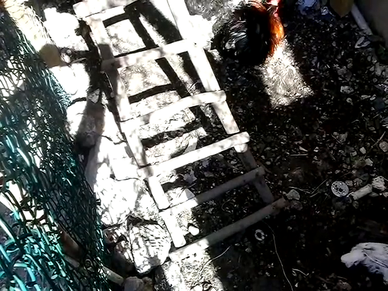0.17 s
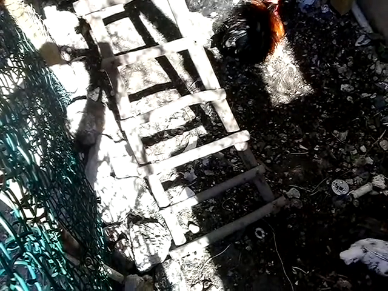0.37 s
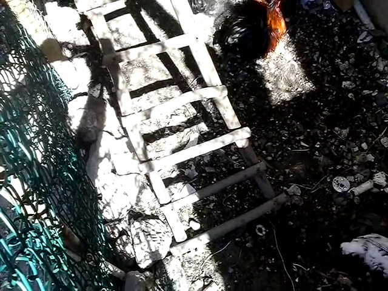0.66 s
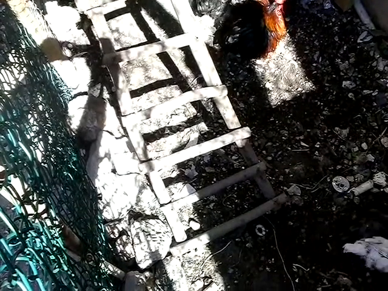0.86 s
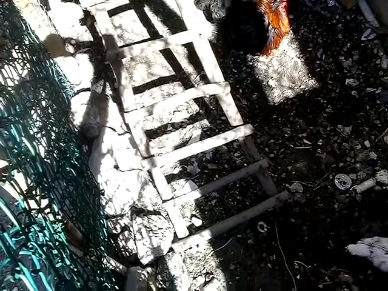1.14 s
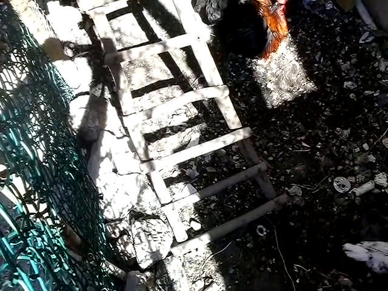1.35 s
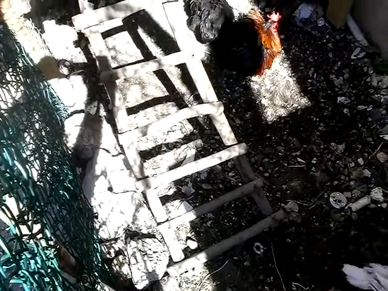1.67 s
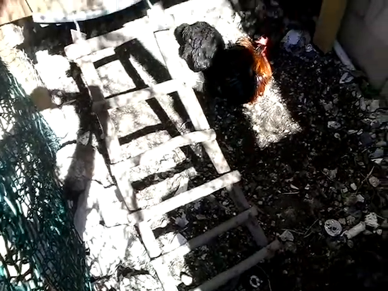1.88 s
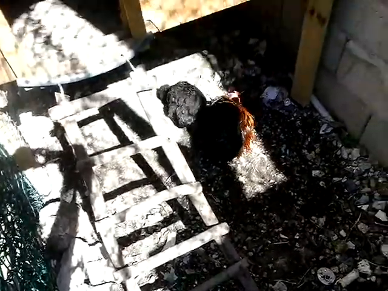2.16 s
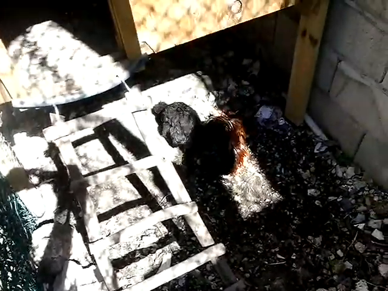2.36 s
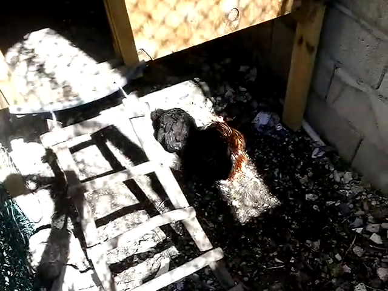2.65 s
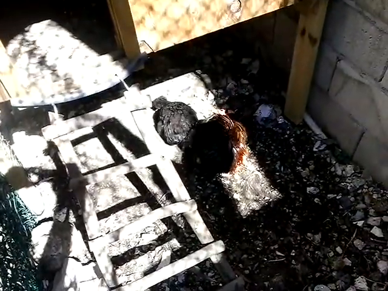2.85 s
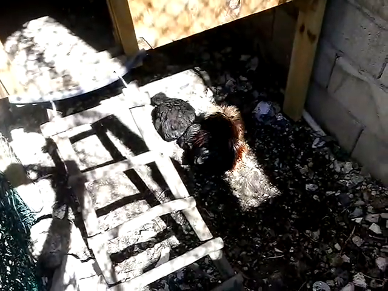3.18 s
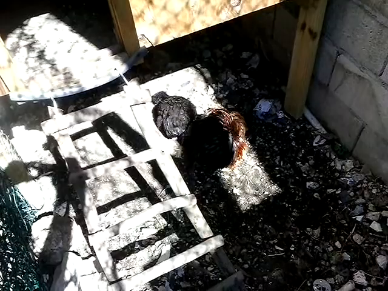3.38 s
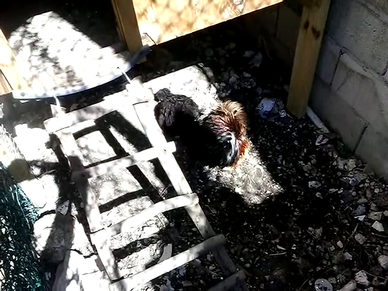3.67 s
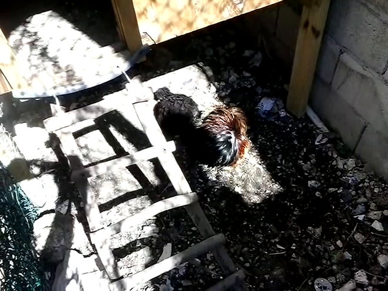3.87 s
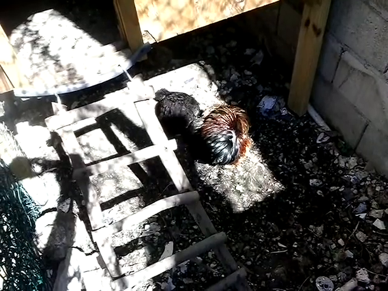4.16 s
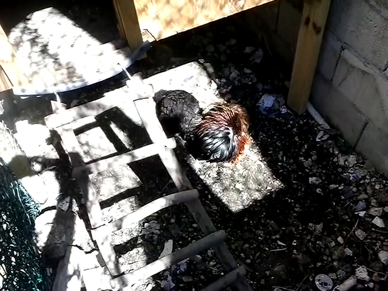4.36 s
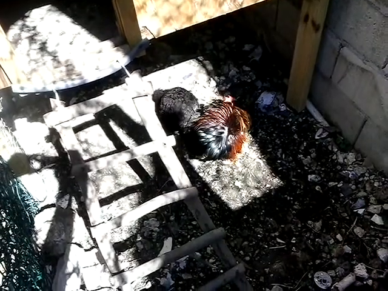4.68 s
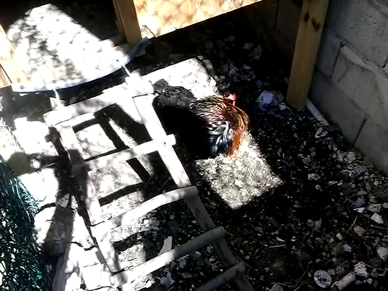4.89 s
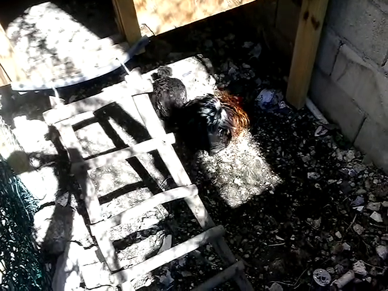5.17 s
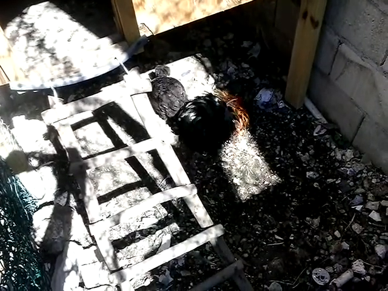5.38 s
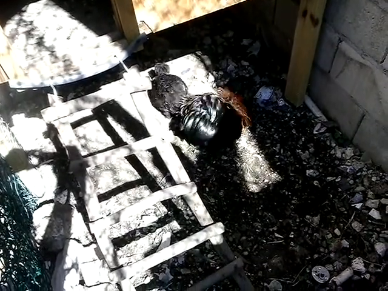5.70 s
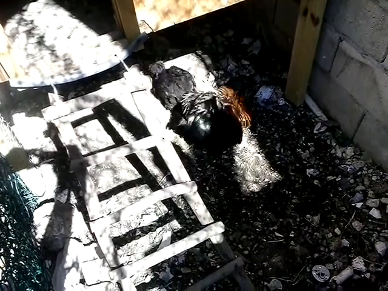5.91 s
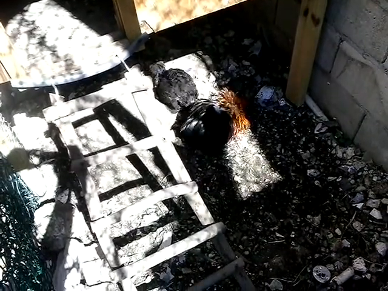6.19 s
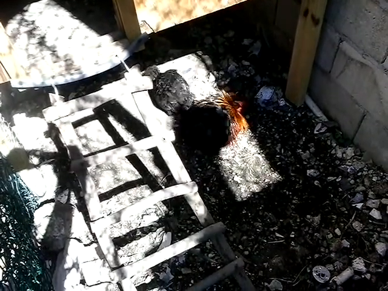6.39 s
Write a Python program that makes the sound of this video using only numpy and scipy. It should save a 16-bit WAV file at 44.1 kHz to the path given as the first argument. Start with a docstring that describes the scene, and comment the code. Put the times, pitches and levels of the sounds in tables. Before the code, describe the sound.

A quiet outdoor pen with near walls, heard through a small hand-held microphone with very faint hiss. At 0.2 s feet fling dry dirt in a short, bright gritty swish. At 0.7 s a small bird gives a high chirp of three quick falling notes; at about 0.86 s another sharp spray of dirt comes with a stone knocking on wood, a short hard clack. A dull, low thump bumps the microphone at 1.1 s, with weaker ones around it. From 1.8 to 3.3 s chirps repeat among faint peeps and tiny rustles. From 3.75 to 4.2 s feathers shake in rapid snapping, puffing beats over a dry rustle, strongest after 4 s; another flurry runs 4.5 to 4.75 s, and two last beats come near 5.05 s. Chirps continue through 3.8, 4.2, 5.2 and 5.6 s, growing fainter, then only slight rustles remain until 6.5 s.

```python
"""Dust bath in a walled pen

Chickens dust-bathe outdoors: feet and wings throw dry dirt (bursts of filtered grains), feathers shake in
quick beats (noise snaps and puffs over a rustle) and a flung stone knocks on wood (ringing modes).
A small bird repeats a chirp of three falling notes (gliding sines with an octave), among stray peeps, blurred
by the walls; dull thumps (low modes) and a rumble reach the hand-held microphone over a faint hiss.
"""
import sys
import numpy as np
from scipy import signal
from scipy.fft import rfft, irfft
from scipy.io import wavfile

SR = 44100
rng = np.random.default_rng(int(sys.argv[2]) if len(sys.argv) > 2 else 0)


def to_wav(s):
    """Save 16-bit WAV."""
    ch = np.atleast_2d(s).T  # columns
    pcm = np.round(np.clip(ch, -1, 1) * 32767)  # PCM
    wavfile.write(sys.argv[1], SR, pcm.astype(np.int16))


N = 288414

# Hiss spectrum: f/Hz, level/dB
HISS_SPECTRUM = [(30, -29), (110, -4.5), (280, -19), (450, -7.5), (700, -9), (1300, -12), (3000, -15),
                 (5000, -16.5), (7000, -12), (7800, -13.5), (8050, -20.5), (8400, -9.5), (9000, -19),
                 (9400, -43.5)]
# Thumps on the microphone: t/s, level/dB
THUMPS = [(0.113, -65), (0.358, -62), (0.407, -60.5), (0.628, -53.5), (0.738, -57), (0.813, -53),
          (0.851, -52), (0.952, -41.5), (0.99, -50.5), (1.121, -28), (1.147, -47.5), (1.19, -51),
          (1.264, -51), (2.023, -55), (2.339, -49), (2.423, -46.5), (2.492, -52), (2.55, -58),
          (2.631, -55.5), (2.985, -53), (3.515, -58)]
# What a thump rings: f/Hz, level/dB, t60/s
THUMP_MODES = [(95.3, -13, 0.13), (128, 4.5, 0.12), (167, 2.5, .12), (226, 0.5, 0.047), (353, -30, 0.049)]
# Handling rumble, level curve: t/s, level/dB
RUMBLE_CURVE = [(0.0, -83), (0.31, -71), (0.78, -74), (1.02, -58), (1.44, -84), (2.02, -68), (2.26, -73.5),
                (2.48, -66), (2.8, -79), (3.3, -69.5), (3.73, -75), (4.06, -62), (4.84, -73), (5.08, -68.5),
                (6.16, -80), (6.54, -77)]
# Low murmurs or wing whumps to high rustles: t/s, level/dB, rise and hold together/s, low f/Hz, high f/Hz
SMALL_BURSTS = [(0.143, -73, .04, 1750, 2250), (0.416, -64, 0.064, 630, 1000),
                (0.616, -66, 0.049, 1980, 4000), (0.647, -56, 0.041, 6100, 8100),
                (0.84, -52, 0.025, 6100, 7100), (1.756, -72, 0.041, 1050, 1340),
                (1.919, -61, 0.073, 4400, 8600), (2.031, -52, 0.015, 5160, 7300),
                (2.244, -61, 0.07, 3330, 5140), (2.417, -64, 0.12, 4050, 7840),
                (2.484, -66.5, 0.055, 660, 1180), (2.569, -67, 0.017, 5500, 6930),
                (2.677, -66, 0.015, 4500, 7690), (2.97, -66, 0.022, 4330, 7500),
                (3.176, -63, 0.12, 340, 557), (3.503, -71, 0.086, 5160, 8300),
                (3.612, -65.5, 0.046, 350, 527), (4.054, -53, 0.239, 354, 566),
                (4.379, -55, 0.059, 4200, 6600), (4.518, -57.5, 0.13, 334, 760),
                (4.756, -61, 0.11, 1686, 2230), (4.928, -64, 0.033, 1750, 3670),
                (5.62, -65.5, 0.23, 6150, 7700), (5.745, -58.5, 0.05, 6360, 6900),
                (5.866, -74.5, 0.099, 1300, 2150), (5.852, -68.5, 0.16, 5700, 7700),
                (5.958, -71.5, 0.048, 6030, 6600), (6.065, -66.5, .195, 6050, 7800),
                (6.07, -71, 0.057, 1330, 2310), (6.215, -67, .033, 6000, 7320),
                (6.217, -73.5, 0.036, 4120, 4730), (6.293, -55.5, 0.025, 2370, 3420),
                (6.298, -63, 0.027, 927, 1470), (6.395, -57, 0.032, 2370, 3200)]
# Feet raking and throwing dirt: t/s, level/dB, rise/s, hold/s, t60/s, lowest f/Hz, tilt/dB per octave
SCRATCHES = [(0.233, -24.5, 0.038, 0.036, 0.12, 1620, 11), (0.311, -48, 0.028, 0.05, 0.14, 1592, 2.5),
             (0.4, -49, 0.046, 0.018, 0.31, 700, 10), (0.857, -29, 0.0025, 0.029, 0.17, 1274, 4),
             (0.909, -47, .01, 0.086, 0.16, 998, -2), (3.601, -49, 0.011, 0.042, 0.16, 1540, -2.5),
             (5.316, -49, 0.01, 0.09, 0.19, 1440, -2.5)]
# Spectrum of thrown dirt before the tilt: f/Hz, level/dB
DIRT_SPECTRUM = [(600, -4), (2600, -2), (3400, 3), (4300, -3.5), (5400, -3), (6300, 1.5), (7200, -2),
                 (7700, -9), (8500, -20)]
# Peeps, stray notes, faint clucks: t/s, level/dB, start f/Hz, end f/Hz, length/s, hoarseness 0-1
PEEPS = [(0.454, -48.5, 1830, 1920, 0.02, 0.06), (0.792, -45.5, 2983, 3283, 0.17, 0.09),
         (1.883, -54, 2516, 1924, 0.056, 0.15), (2.034, -38.5, 5390, 5464, 0.014, 0.02),
         (2.102, -64.5, 1700, 2160, 0.0364, 0.07), (2.136, -65.5, 2436, 2406, 0.11, 0.03),
         (2.627, -69.5, 1970, 1884, 0.043, 0.1), (2.813, -59.5, 960, 824, 0.017, 0.01),
         (2.874, -55, 7180, 6880, 0.023, 0.03), (3.109, -48.5, 3326, 2770, 0.055, 0.11),
         (3.197, -56.5, 2530, 2162, 0.092, 0.14), (3.254, -44, 2617, 3000, 0.07, 0.06),
         (3.292, -60.5, 2310, 3006, 0.068, 0.26), (3.46, -60, 1140, 1332, 0.0345, 0.02),
         (4.396, -46, 5550, 5390, 0.022, 0), (5.357, -47, 3635, 3530, 0.036, 0),
         (5.469, -64.5, 6450, 6430, 0.024, 0.04), (5.706, -55.5, 3060, 2704, 0.047, 0.22),
         (5.754, -55, 3630, 3410, 0.071, 0.28), (6.145, -73.5, 1750, 1724, 0.038, 0.11)]
# Chirps: t/s, reference f/Hz, low note after/s, closing note after/s, high, low and closing level/dB,
# closing pitch ratio, octave trim/dB, high note's length ratio
CHIRPS = [(.702, 3635, 0.048, 0.2, -46.5, -55, -43, 1.05, 3.5, 0.96),
          (1.805, 3554, 0.051, 0.12, -51.5, -50, -43, 1.102, -16, 1.51),
          (2.336, 3690, 0.052, 0.12, -46.5, -45.5, -42, 0.99, -1.5, 1.13),
          (3.041, 3598, 0.049, .12, -55, -53, -44, 1.034, 2.5, 2.44),
          (3.826, 3590, .042, 0.11, -43.5, -48.5, -41, 1.11, -4.5, 0.74),
          (4.236, 3660, 0.041, 0.12, -44, -50, -40.5, 1.0, 1.5, 0.986),
          (5.228, 3734, 0.053, 0.11, -46, -54, -46, 0.98, -1.5, 0.67),
          (5.626, 3760, 0.036, 0.11, -52, -59, -49.5, 1.017, -1.5, 0.62)]
# High, low and closing note: start and end f over the reference, base length/s, hoarseness 0-1,
# octave level/dB before the chirp's trim
CHIRP_NOTES = [(0.99, .875, .058, 0.05, -8.5), (.76, .61, .085, .11, -23.5), (.885, .72, .063, .08, -24.5)]
# The stone's strike: t/s, level/dB
KNOCK = (.861, -24)
# What the struck wood rings: f/Hz, level/dB, t60/s
KNOCK_MODES = [(1265, -9, .13), (1540, -1, .13), (2630, -13, .1), (2980, -2, .13), (3810, -8, .14),
               (4590, -8, .12), (5220, -1, .12), (5820, -1, .1), (6110, -5, .1), (6820, -2, .09)]
# Bouts of feather shaking: t/s, level/dB, rise/s, hold/s, t60/s, treble delay/s, treble trim/dB, lowest f/Hz
SHAKES = [(3.76, -48.5, 0.019, 0.38, 0.97, 0.17, 3, 1080),
          (4.479, -48.5, 0.019, 0.2, 0.39, 0.069, -3.5, 776),
          (4.968, -49.5, 0.04, 0.11, 0.23, 0.063, 4.5, 778)]
# Wing beats: t/s, level/dB
BEATS = [(3.755, -35.5), (3.782, -31.5), (3.847, -33), (3.895, -32.5), (3.934, -37.5), (3.98, -31.5),
         (4.01, -22.5), (4.052, -24), (4.087, -23), (4.127, -30.5), (4.163, -21), (4.196, -26.5),
         (4.321, -41.5), (4.496, -47), (4.52, -30), (4.569, -22.5), (4.625, -22.5), (4.674, -31.5),
         (4.713, -32), (4.766, -42.5), (4.988, -42), (5.036, -27), (5.088, -25)]
# Feather spectrum: f/Hz, level/dB
FEATHER_SPECTRUM = [(600, -33), (800, -5), (1100, -3.5), (1450, -9), (2000, -2.5), (2600, -7), (3050, -8),
                    (3600, -1), (4700, -10.5), (6500, -7), (7600, -14)]

HISS_DB = -76
BURST_RISE_SHARE, BURST_T60_S = 0.23, 0.08
DIRT_TOP_HZ = 7300
PEEP_OCTAVE_DB = -23
PEN_T60_S, PEN_DB = 0.17, -3
TREBLE_STEP_DB = -12  # applied once to the joined treble, twice before it joins
TREBLE_FADE_POWER = 1.06  # times the fall in dB of the mids
HIGH_BAND_DB = -4.5
BASS_CUT_HZ, TOP_STOP_HZ = 110, 9540


def from_db(db):
    """Decibels to amplitude."""
    return 10 ** (np.asarray(db) / 20)


def rms_one(x):
    """Scale to rms 1."""
    return x / np.sqrt(np.mean(x ** 2) + 1e-20)


def add(track, s, piece):
    """Mix a piece in at time s."""
    i = round(s * SR)
    track[i:i + len(piece)] += piece[:N - i]


def band(x, low_hz, high_hz, order=5):
    """Butterworth band-pass."""
    edges = [low_hz, max(high_hz, low_hz + 20)]
    return signal.sosfilt(signal.butter(order, edges, "band", fs=SR, output="sos"), x)


def coloured(x, spectrum):
    """Shape x by a dB spectrum on a log-frequency axis; rms 1."""
    hz = np.maximum(np.fft.rfftfreq(len(x), 1 / SR), 1)
    point_hz, point_db = np.array(spectrum).T
    gain = from_db(np.interp(np.log(hz), np.log(point_hz), point_db))
    return rms_one(irfft(rfft(x) * gain, len(x)))


def flicker(cutoff_hz):
    """Low-passed noise of rms 1, for slow random level changes."""
    low_pass = signal.butter(2, cutoff_hz, fs=SR, output="sos")
    return rms_one(signal.sosfilt(low_pass, rng.standard_normal(N)))


def grit(size, per_s, spread_db):
    """Uneven grainy clicks over a little smooth noise; rms 1."""
    strengths = from_db(spread_db * np.minimum(rng.exponential(1, size), 4))
    clicks = strengths * rng.choice([-1, 1], size) * (rng.random(size) < per_s / SR)
    return rms_one(clicks + 0.34 * rng.standard_normal(size))


def swell(rise, hold, t60):
    """Envelope: a smooth rise, a hold and an even decay in dB."""
    t = np.arange(round((rise + hold + t60) * SR)) / SR
    attack = np.sin(np.pi / 2 * np.clip(t / max(rise, 1e-4), 0, 1)) ** 2
    return attack * from_db(-60 * np.maximum(t - rise - hold, 0) / t60)


def ring(clicks, hz, t60):
    """Two-pole resonator: a unit click starts a decaying sine of height 1."""
    r, w = from_db(-60 / (t60 * SR)), 2 * np.pi * hz / SR
    return signal.lfilter([0, np.sin(w)], [1, -2 * r * np.cos(w), r * r], clicks + 1e-18)


def hiss():
    """Faint coloured noise whose level wavers slightly."""
    level = from_db(HISS_DB + 0.4 * flicker(11.0))
    return level * coloured(rng.standard_normal(N), HISS_SPECTRUM)


def rumble():
    """Low noise from handling, lumpy in level."""
    times, levels_db = np.transpose(RUMBLE_CURVE)
    curve_db = np.interp(np.arange(N) / SR, times, levels_db)
    noise = rms_one(band(rng.standard_normal(N), 45, 300, order=2))
    return noise * from_db(curve_db + 1.3 * flicker(10.0))


def thumps():
    """Soft pushes ring low modes, each mode with a new strength every time."""
    times, levels_db = np.transpose(THUMPS)
    at = np.round(times * SR).astype(int)
    out = np.zeros(N)
    for hz, mode_db, t60 in THUMP_MODES:
        clicks = np.zeros(N)
        clicks[at] = from_db(levels_db + mode_db - 1 + rng.normal(0, 1.0, len(at)))
        out += ring(clicks, hz, t60)
    push = -signal.windows.hann(round(0.0042 * SR))  # a soft contact lasts some milliseconds
    return np.convolve(out, push / abs(push.sum()))[:N]


def small_bursts(grains):
    """Small noise bursts, from low murmurs or wing whumps to high rustles, each in its own band."""
    out = np.zeros(N)
    for s, level_db, length, low_hz, high_hz in SMALL_BURSTS:
        shape = swell(BURST_RISE_SHARE * length, (1 - BURST_RISE_SHARE) * length, BURST_T60_S)
        i = round(s * SR)
        burst = rms_one(band(grains[i:i + len(shape)], low_hz, high_hz, order=3))
        add(out, s, from_db(level_db) * shape * burst)
    return out


def scratches(grains):
    """Feet rake the ground: wide bursts of grains, each with its own brightness."""
    out = np.zeros(N)
    for s, level_db, rise, hold, t60, low_hz, tilt_db in SCRATCHES:
        shape = swell(rise, hold, t60)
        i = round(s * SR)
        spectrum = [(hz, db + tilt_db * np.log2(hz)) for hz, db in DIRT_SPECTRUM]
        dirt = coloured(grains[i:i + len(shape)], spectrum)
        add(out, s, from_db(level_db) * shape * rms_one(band(dirt, low_hz, DIRT_TOP_HZ)))
    return out


def scratches_and_bursts():
    """Scratches and small bursts draw on one stream of grainy noise with an uneven level."""
    grains = grit(N + SR, per_s=11000, spread_db=2.0)
    return (small_bursts(grains) + scratches(grains)) * from_db(0.29 * flicker(40.0))


def wobble(window_size, size):
    """Smoothed noise of rms 1; a longer window moves slower."""
    window = signal.windows.hann(window_size)
    return rms_one(np.convolve(rng.standard_normal(SR // 4), window, "valid"))[:size]


def glide(start_hz, end_hz, length, octave_db, rough):
    """A gliding note and its octave; hoarseness shakes the pitch and chops the tone with noise."""
    u = np.linspace(0, 1, round(length * SR))
    hoarse = np.clip(rough, 0, 0.3)
    slow, fast = wobble(180, len(u)), wobble(75, len(u))
    path_hz = end_hz + (start_hz - end_hz) * (1 - u) ** 2.6  # nears its end pitch early
    phase = 2 * np.pi * np.cumsum(path_hz * (1 + (0.016 + 0.3 * hoarse) * slow)) / SR
    shape = np.sin(np.pi / 2 * np.minimum(u / 0.15, 1)) ** 2 * (1 - u ** 5)
    voice = np.sqrt(1 - 2 * hoarse) + np.sqrt(2 * hoarse) * fast
    octave = from_db(octave_db) * (1 - u) * (1 + fast) * np.sin(2 * phase)
    return np.sqrt(2) * shape * voice * (np.sin(phase) + octave)


def peeps():
    """Single gliding notes, from faint clucks to high peeps."""
    out = np.zeros(N)
    for s, level_db, start_hz, end_hz, length, rough in PEEPS:
        add(out, s, from_db(level_db) * glide(start_hz, end_hz, length, PEEP_OCTAVE_DB, rough))
    return out


def chirps():
    """Three falling notes per chirp; a small throat keeps them out of the lows."""
    out = np.zeros(N)
    for s, pitch_hz, low_after, closing_after, *levels_db, closing, octave_trim_db, stretch in CHIRPS:
        delays, pitches = (0, low_after, closing_after), (pitch_hz, pitch_hz, pitch_hz * closing)
        notes = zip(delays, levels_db, pitches, (stretch, 1, 1), CHIRP_NOTES)
        for after, level_db, hz, longer, (start, end, length, rough, octave_db) in notes:
            note = glide(start * hz, end * hz, longer * length, octave_db + octave_trim_db, rough)
            add(out, s + after, from_db(level_db) * note)
    return band(out, 1600, 8600)


def pen(x):
    """Dense short echoes from the walls, fence and ground: decaying noise as impulse response."""
    t = np.arange(round(PEN_T60_S * SR)) / SR
    decay = from_db(-60 * t / PEN_T60_S) * np.minimum(t / 0.0066, 1)
    echoes = rng.standard_normal(len(t)) * decay
    echoes /= np.sqrt(np.sum(echoes ** 2))
    return x + from_db(PEN_DB) * signal.fftconvolve(x, echoes)[:N]


def knock():
    """A flung stone strikes wood: one sharp click rings modes of alternating sign."""
    s, level_db = KNOCK
    click, out = np.zeros(N), np.zeros(N)
    click[round(s * SR)] = from_db(level_db)
    for k, (hz, mode_db, t60) in enumerate(KNOCK_MODES):
        out += (-1) ** k * from_db(mode_db) * ring(click, hz, t60)
    return band(out, 1000, 9000, order=2)


def feather_rustle():
    """A rustle of fine grains under the beats, brighter once under way."""
    feathers = coloured(grit(N, per_s=2200, spread_db=1.0), FEATHER_SPECTRUM)
    treble = band(feathers, 4000, 7600) / np.std(band(feathers, 4200, 6200))
    mids, treble_level = np.zeros(N), np.zeros(N)
    for s, level_db, rise, hold, t60, delay, treble_db, low_hz in SHAKES:
        shape = swell(rise, hold, t60)
        i = round(s * SR)
        add(mids, s, from_db(level_db) * shape * rms_one(band(feathers[i:i + len(shape)], low_hz, 3510)))
        joined = np.clip((np.arange(len(shape)) / SR - delay) / 0.0086, 0, 1)
        gain = from_db(level_db + treble_db + TREBLE_STEP_DB * (2 - joined))
        add(treble_level, s, gain * shape ** TREBLE_FADE_POWER)
    return mids + treble_level * treble


def wing_beats():
    """Each beat is a snap and a puff of grainy noise that dies fast."""
    t = np.arange(round(0.08 * SR)) / SR
    puff = 0.16 * np.minimum(t / 0.0083, 1) * from_db(-60 * t / 0.17)
    snap = 0.27 * from_db(-60 * np.abs(t - 0.002) / 0.014)
    envelope = np.zeros(N)
    for s, level_db in BEATS:
        add(envelope, s, from_db(level_db) * (puff + snap))
    return envelope * coloured(grit(N, per_s=6400, spread_db=4.0), FEATHER_SPECTRUM)


def patchy(x, patch_db):
    """Each region of pitch swells and sinks on its own, so the texture shifts from moment to moment."""
    spectrum, hz = rfft(x), np.fft.rfftfreq(N, 1 / SR)
    place = np.interp(np.log(hz + 1), np.log([300, 9200]), [0, 13])
    out = np.zeros(N)
    for k in range(14):  # overlapping triangular regions that sum to 1
        part = irfft(spectrum * np.clip(1 - abs(place - k), 0, 1), N)
        out += part * from_db(patch_db * flicker(18.0))
    return out


def split_treble(x):
    """Steep low-pass near 7.9 kHz, plus a weak band at 8.25-9.15 kHz."""
    main = signal.sosfilt(signal.cheby2(20, 50, 7900, fs=SR, output="sos"), x)
    return main + from_db(HIGH_BAND_DB) * band(x, 8250, 9150)


def scene():
    """All sources, mono; thumps, rumble and hiss bypass the treble filter."""
    dirt_and_feathers = patchy(scratches_and_bursts() + feather_rustle() + wing_beats(), patch_db=2.5)
    birds = pen(peeps() + chirps())
    filtered = split_treble(dirt_and_feathers + birds + knock())
    return np.array([filtered + thumps() + rumble() + hiss()])


def record(dry):
    """The small microphone loses the deep bass; the top is cut steeply."""
    thin = signal.sosfilt(signal.butter(2, BASS_CUT_HZ, "high", fs=SR, output="sos"), dry)
    return signal.sosfilt(signal.cheby2(14, 70, TOP_STOP_HZ, fs=SR, output="sos"), thin)


dry = scene()
out = record(dry)
to_wav(out)
```